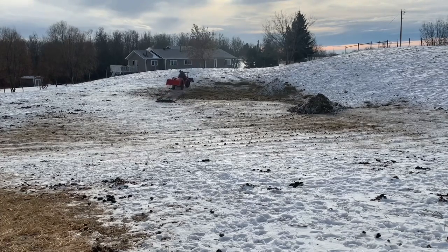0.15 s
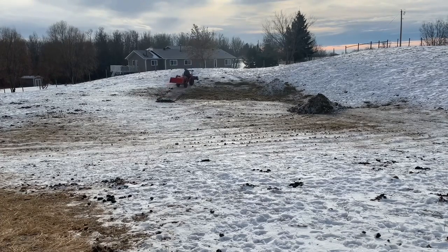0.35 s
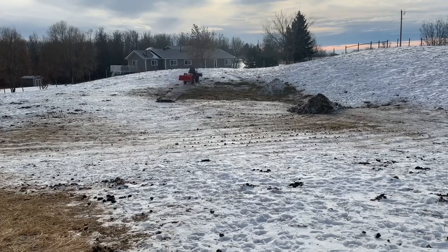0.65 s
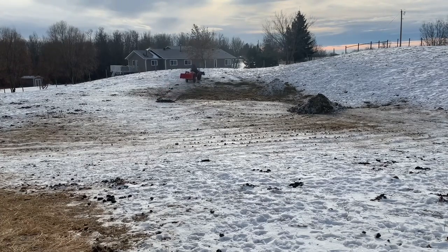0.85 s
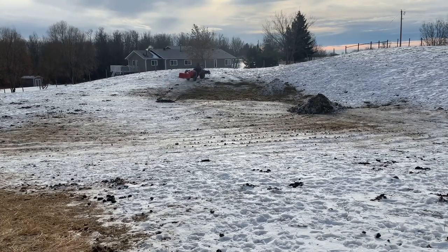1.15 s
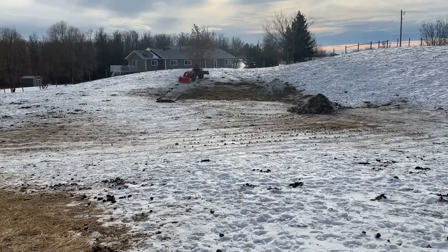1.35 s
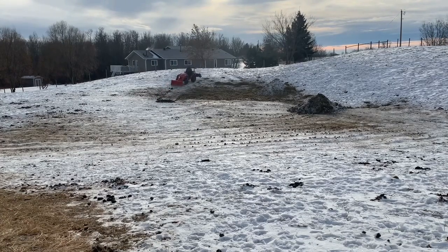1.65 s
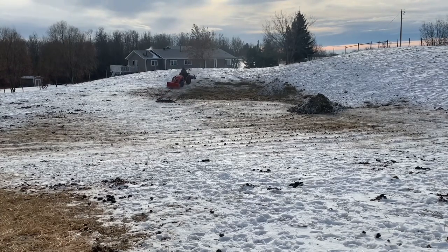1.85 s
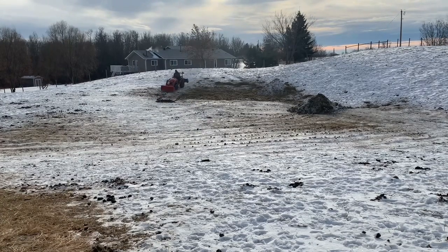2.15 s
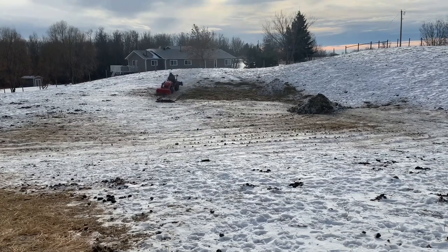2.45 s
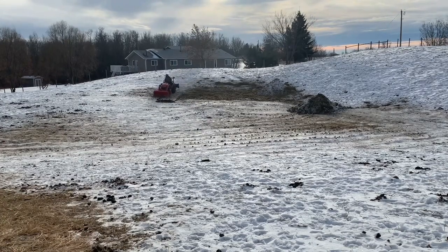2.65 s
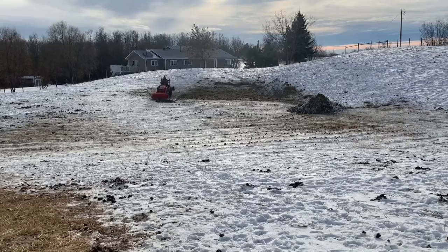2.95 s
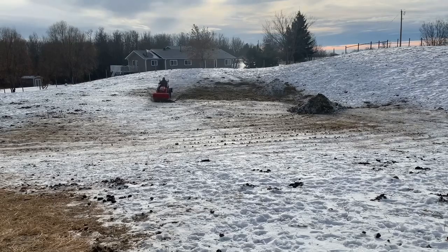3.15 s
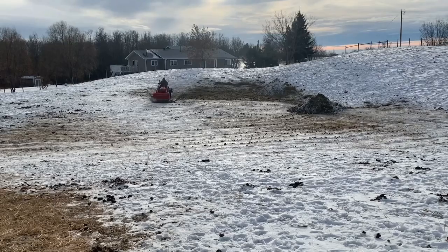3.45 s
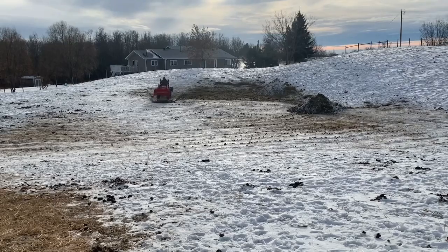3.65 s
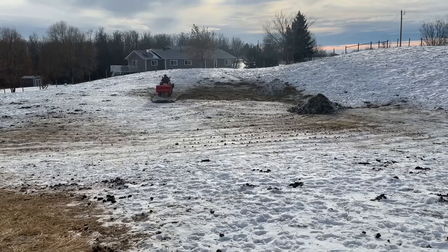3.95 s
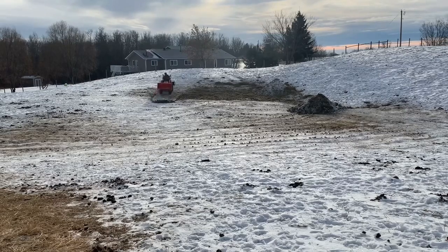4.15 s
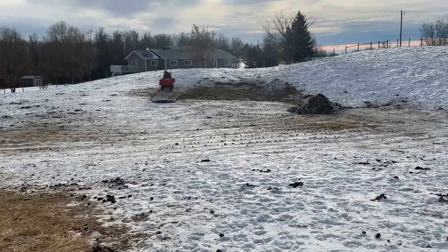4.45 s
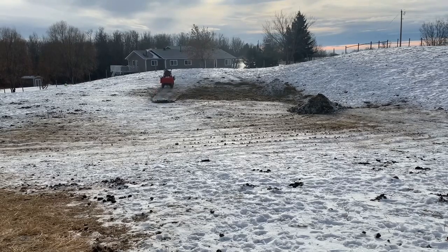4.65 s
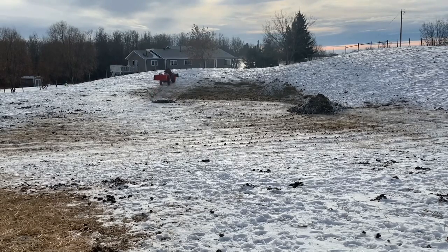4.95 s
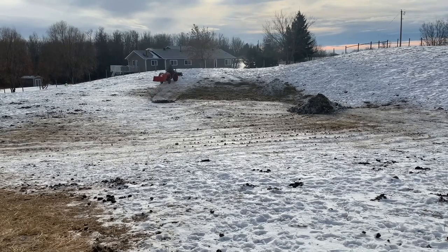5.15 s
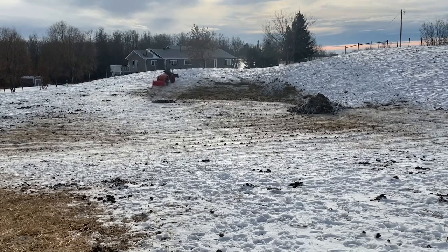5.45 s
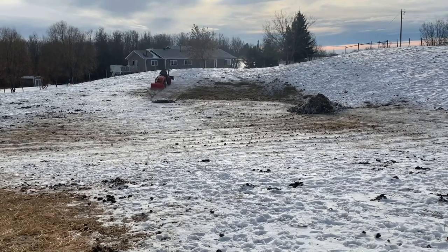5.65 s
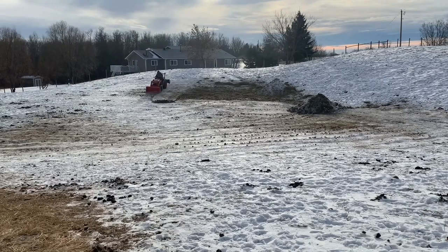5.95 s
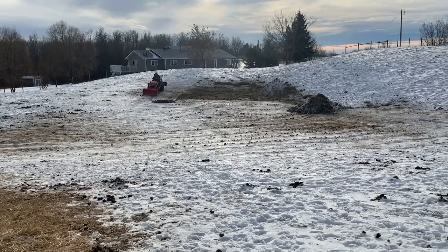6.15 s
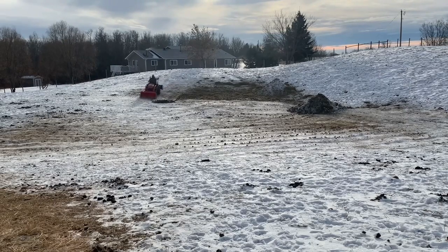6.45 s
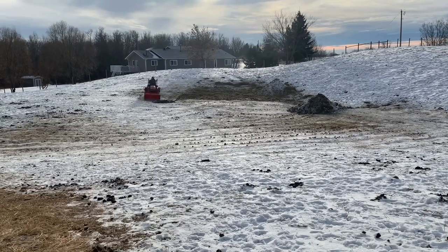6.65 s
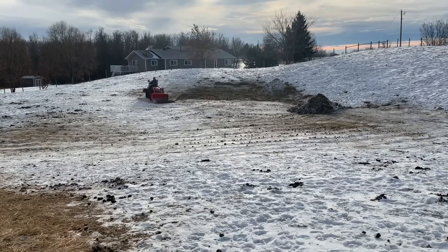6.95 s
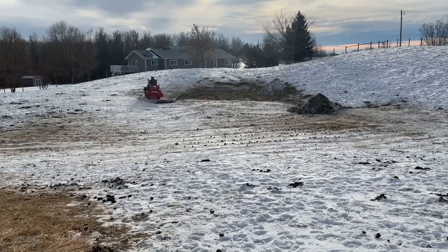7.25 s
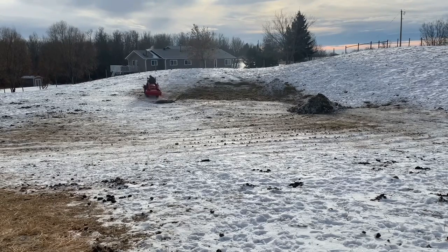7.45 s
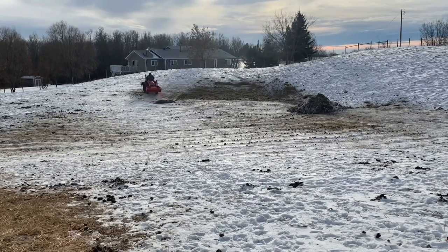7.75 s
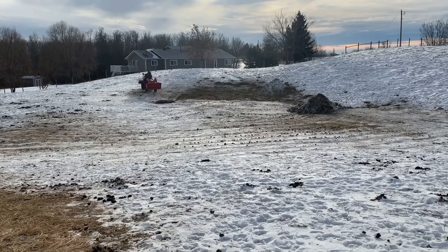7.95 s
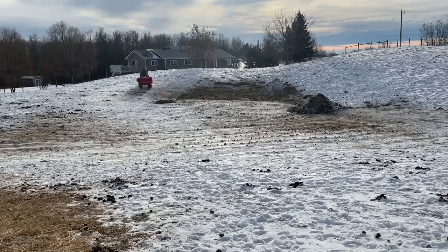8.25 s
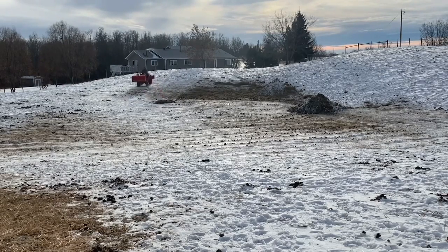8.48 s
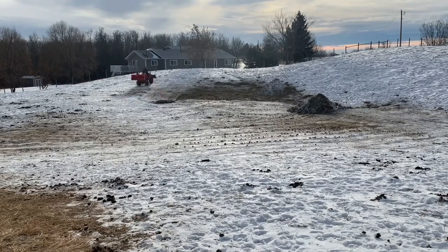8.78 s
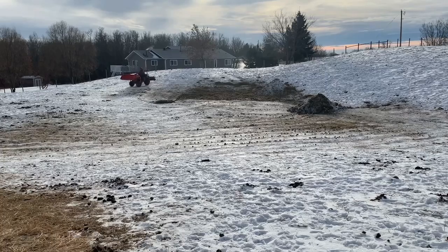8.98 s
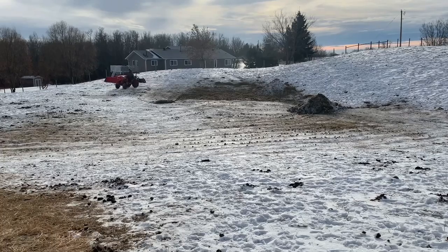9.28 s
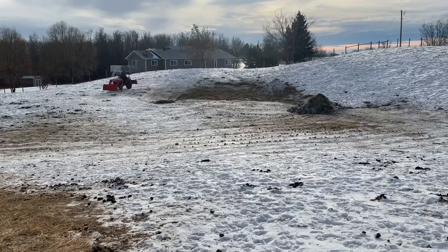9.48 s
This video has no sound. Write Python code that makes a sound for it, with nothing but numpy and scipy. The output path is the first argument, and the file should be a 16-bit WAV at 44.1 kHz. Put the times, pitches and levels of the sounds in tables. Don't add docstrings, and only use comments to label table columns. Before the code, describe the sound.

Open field, windy, phone microphone, wide but mostly centred stereo. A small diesel tractor gives a nearly constant low hydraulic whine, around the B or C near middle C, wavering slightly, over soft airy hiss. Wind pops patter in the first third of a second. From about 1.1 to 2.8 seconds the loader works: hollow, boxy panel knocks run together into a rough growl while oil hiss surges, then fades. From 3 to 4.8 the clear whine returns, with a faint very high squeal around 4.3. A sharp knock and tick land at 4.84, hard wind pops near 4.95, then a louder rattling, hissing stroke from 5.1 to 6.5, easing as it goes. Whine and gusts continue, slightly duller. Light steel ticks scatter from 8.75 to 9.1, and a sudden dense rattle with hiss bursts from 9.35 to the end at about 9.6.

```python
import sys
import numpy as np
from scipy import signal
from scipy.fft import rfft, irfft, next_fast_len
from scipy.io import wavfile
from scipy.ndimage import uniform_filter1d

SR = 44100
rng = np.random.default_rng(int(sys.argv[2]) if len(sys.argv) > 2 else 0)


def int16_out(signal):
    q = np.round(np.clip(np.atleast_2d(signal).T, -1, 1) * 32767)
    wavfile.write(sys.argv[1], SR, q.astype(np.int16))


def voltage_ratio(decibels):
    exponent = np.asarray(decibels, float) / 20
    return 10 ** exponent


N = 424223
HOP = 128


# time in seconds, tooth rate in Hz, whine level in dB.
PUMP_SPEED = [(0.0, 251.5, -43), (0.45, 255.7, -30), (0.74, 256.5, -29), (0.84, 262.5, -31),
              (1.1, 262, -28), (1.25, 266.5, -27), (1.6, 267.8, -29), (2.3, 262, -28.5), (2.72, 268.3, -29),
              (3.0, 256, -27.5), (3.22, 252.3, -33.5), (3.5, 257.3, -27.5), (3.9, 255.7, -31),
              (4.5, 253.6, -31.5), (4.74, 254.2, -40.5), (4.85, 263, -30), (5.1, 262.6, -30),
              (6.4, 261.7, -30), (6.75, 258.1, -32), (7.04, 255.2, -43), (7.2, 253, -31),
              (7.9, 255.3, -31.5), (8.0, 258.6, -26), (8.24, 259, -40), (8.33, 263.6, -30),
              (8.47, 263.8, -31.5), (8.56, 258, -29), (8.94, 256.9, -29), (9.04, 263.9, -28.5),
              (9.62, 265, -30)]
# start and end in seconds, multiple of the tooth rate, level in dB.
PUMP_OVERTONES = [(0.35, 0.93, 2, -42), (3.004, 4.11, 2, -37), (6.79, 7.51, 2, -42), (7.447, 8.763, 2, -37),
                  (8.69, 9.101, 2, -41.5), (0.36, 1.15, 3, -48), (2.505, 3.08, 3, -47),
                  (3.18, 4.903, 3, -43), (7.124, 7.686, 3, -44), (7.617, 8.697, 3, -41.5),
                  (8.605, 9.314, 3, -37), (0, 1.134, 4, -48), (1.402, 1.8, 4, -52), (2.906, 3.8, 4, -47),
                  (3.702, 4.5, 4, -53.5), (1.852, 2.552, 4, -50.5), (2.849, 3.5, 5, -56),
                  (4.052, 4.6, 2, -51), (5.9, 6.6, 3, -48), (8.993, 9.402, 2, -42), (9.154, 9.62, 4, -54),
                  (5.05, 5.5, 3, -46.5), (9.195, 9.746, 3, -43.5), (9.3, 9.75, 2, -39)]
SWELL_S = .13


def pump():
    t = np.arange(N) / SR
    tooth_hz, whine_db = curves(PUMP_SPEED, t)
    turns = np.cumsum(tooth_hz * (1 + 0.003 * wander(45.3))) / SR
    out = voltage_ratio(whine_db + 0.63 * wander(27)) * np.sin(2 * np.pi * turns)
    for start, end, multiple, db in PUMP_OVERTONES:
        part = slice(round(start * SR), round(end * SR))
        spell = np.minimum(np.minimum(t[part] - start, end - t[part]) / SWELL_S, 1)
        waver_db = (1.1 + 0.07 * multiple) * wander(52, count=len(spell))
        out[part] += spell * voltage_ratio(db + waver_db) * np.sin(2 * np.pi * round(multiple) * turns[part])
    return np.sqrt(2) * out


# time in seconds, peak in dB, ring in Hz.
PANEL_JOLTS = [(4.84, -14, 554), (4.864, -17, 570), (4.884, -25, 577), (8.759, -21.5, 509),
               (8.972, -21, 527), (9.356, -13.5, 557), (9.384, -18.5, 431), (9.414, -22, 526),
               (9.434, -13.5, 542), (9.469, -14, 519), (9.499, -17.5, 517), (9.529, -24, 507),
               (9.558, -12, 508.5), (9.595, -13, 518),
               (1.104, -17.5, 522), (1.197, -17, 515), (1.255, -11.5, 505), (1.317, -16, 507),
                      (1.385, -29, 477), (1.416, -17.5, 512), (1.549, -17, 493), (1.644, -13.5, 504),
                      (1.685, -15, 498), (1.739, -20, 587), (1.756, -17, 500), (1.786, -18, 493),
                      (1.83, -19, 533), (1.861, -17, 538), (1.901, -12, 495), (1.957, -18, 506),
                      (2.025, -17, 505), (2.099, -18, 509), (2.125, -14.5, 480), (2.192, -11, 504),
                      (2.225, -11.5, 503), (2.258, -23, 530), (2.283, -21, 563), (2.302, -25, 540),
                      (2.32, -25, 504), (2.345, -19, 508), (2.369, -12.5, 501), (2.434, -18, 584),
                      (2.448, -17, 497), (2.493, -17, 514), (2.511, -23.5, 521), (2.543, -23, 552),
                      (2.625, -12.5, 493), (2.682, -30, 526), (2.714, -20, 514.5), (2.779, -22, 510),
                      (2.806, -19, 516.4),
               (5.044, -35, 492.4), (5.082, -12.5, 500), (5.175, -18, 614), (5.238, -19, 547.6),
                       (5.254, -15, 495), (5.314, -9.5, 511), (5.359, -17, 555), (5.402, -15, 509.5),
                       (5.463, -20, 614.5), (5.48, -17, 525), (5.508, -12.5, 514), (5.553, -12.5, 500),
                       (5.617, -18, 511.5), (5.641, -14.5, 522), (5.675, -13, 497), (5.709, -16, 516),
                       (5.75, -8, 516.4), (5.776, -7, 502), (5.829, -9.5, 569), (5.903, -17.5, 497),
                       (5.946, -20, 517), (5.985, -16, 484), (6.021, -23, 523), (6.048, -15, 498),
                       (6.083, -17, 490), (6.125, -15.5, 546), (6.15, -13, 510), (6.209, -14, 508),
                       (6.242, -12.5, 494), (6.269, -16, 539), (6.296, -20, 468), (6.309, -13.5, 529),
                       (6.38, -13, 487), (6.41, -19, 510), (6.436, -21, 530), (6.459, -23, 504.3),
                       (6.484, -22.5, 498), (6.541, -25, 517.5), (6.577, -25, 480.6)]
RISE_S, RING_S, UPPER_SHARE = .0009, .017, .8


def jolts():
    t, rings, struck = np.arange(3000) / SR, np.zeros(N), np.zeros(N)
    for s, db, hz in sorted(PANEL_JOLTS):
        ring = np.sin(2 * np.pi * hz * t)
        ring += UPPER_SHARE * np.sin(2 * np.pi * 1.24 * hz * t) * np.exp(-t / 0.005)
        fade = (1 - np.exp(-t / RISE_S)) * np.exp(-t / RING_S)
        start = round(s * SR)
        part, after = rings[start:][:len(t)], struck[start:][:len(t)]
        part *= np.exp(-t / RISE_S)[:len(part)]
        part += (voltage_ratio(db - 1.1) * ring * fade)[:len(part)]
        after += np.sqrt(fade)[:len(part)]
    return rings, struck


# time in seconds, level in dB.
ENGINE_LOAD = [(0, -67), (0.1, -73), (0.8, -42), (1.05, -32.5), (1.22, -25), (1.6, -23.5), (2.74, -30),
               (2.9, -41), (3.4, -37.5), (4.2, -39.5), (4.77, -42.5), (4.9, -28), (5.04, -49), (5.12, -24),
               (5.78, -22), (6.45, -26), (6.58, -39), (7.0, -39), (8.0, -36), (8.6, -36.5), (9.28, -38),
               (9.42, -21), (9.62, -28)]
# centre in Hz, width in Hz, level in dB, share that sounds without load from 0 to 1.
BODY_MODES = [(496.8, 20, 0.5, 0), (519.5, 42, 3, 0.23), (432, 53, -5.5, 0), (562.5, 105, 3, 0.28),
              (390, 214, 2.5, 0), (782, 54, -12, 0.4), (1133, 29, -14, 0)]
SETTLES = .55
CHATTER_PER_S, CHATTER = 140, 14


def boom():
    rings, struck = jolts()
    level_db = curves(ENGINE_LOAD, np.arange(N) / SR)[0]
    awake = np.clip((level_db + 42) / 10, 0, 1)
    level = voltage_ratio(level_db - 1.5 - 5 * awake)
    level *= 1 - awake * (1 - SETTLES) * (1 - np.minimum(struck, 1))
    size = next_fast_len(N)
    hz = np.fft.rfftfreq(size, 1 / SR)
    always = loaded = 0
    for centre, width, db, idle in BODY_MODES:
        mode = voltage_ratio(db) * evened(1 / (1 + 2j * (hz - centre) / (1.44 * width)) ** 2)
        always = always + idle * mode
        loaded = loaded + (1 - idle) * mode
    out = []
    for share in (1, .17):
        force = voltage_ratio(1.4 * wander(270)) + CHATTER * (rng.random(N) < CHATTER_PER_S / SR)
        shake = rfft(evened(rng.standard_normal(N) * force), size)
        shaken = irfft(shake * always, size)[:N] + awake * irfft(shake * loaded, size)[:N]
        out.append(share * level * band(shaken, 258, 1180))
    return np.array([out[0] + out[1], out[0] - out[1]]) + band(rings, 367, 920, order=1)


# start and end in seconds, surge over idle flow in dB, sag in dB per second.
RAM_STROKES = [
    (1.075, 2.81, 10, 3.5),
    (5.08, 6.5, 9.5, 4.5),
    (9.33, 11, 8.5, 22),
    (0.54, 1.14, 1.5, -1.5),
    (8.75, 9.0, 1, -3.5),
    (7.7, 8.55, -1.5, 0.3),
]
OPEN_S, SHUT_S = .05, .025


def flow(t):
    total_db = 0
    for start, end, surge_db, sag_db in RAM_STROKES:
        opening = np.clip(np.minimum((t - start) / OPEN_S, (end - t) / SHUT_S), 0, 1)
        total_db = total_db + opening * (surge_db - sag_db * (t - start))
    return total_db


# frequency in Hz, density in dB per Hz.
CLATTER_COLOUR = [(200, -3), (500, 12.5), (900, 3), (1140, 1.5), (1350, -6), (1600, -83), (2500, -69)]
# frequency in Hz, density in dB per Hz.
HISS_COLOUR = [(900, -10.5), (1500, 1.5), (2200, 3), (4000, 3), (5000, -0.5), (5700, -5), (8000, -23)]
# frequency in Hz, density in dB per Hz.
FIZZ_COLOUR = [(4500, -17.5), (5500, 1.5), (7300, -0.5), (10400, 0), (13500, -8), (15000, -10.5),
               (15800, -32)]
HISS_IDLE_DB, FIZZ_IDLE_DB, FIZZ_FOLLOWS = -46.5, -52.5, 0.76
# middle in seconds, half width in seconds, lift in dB.
OIL_SPURTS = [(1.25, .04, 4), (1.46, .05, 2.5), (1.6, .04, 3), (2.2, 0.049, -0.5), (2.65, 0.032, 0.5),
              (5.25, .1, 3.5), (5.5, 0.031, 3), (5.85, 0.064, 3), (6.4, 0.052, 0.5), (8.82, .03, 3.5),
              (9.41, .04, 1)]
# time in seconds, inverse echo delay in Hz, clatter level in dB as
# the engine side turns in and out of view, lift of the top of the fizz in dB.
TRACTOR_MOTION = [(0.0, 960, -35.5, 3), (0.9, 904, -42.5, -1), (1.8, 1056, -35.5, 4), (2.8, 1096, -41.5, 1),
                  (3.3, 1080, -32.5, -1), (4.7, 1075, -42, 1.5), (5.5, 1158, -40.5, 3.5),
                  (6.9, 1166, -36.5, -1), (7.6, 1190, -34.5, 0.5), (8.5, 1275, -53, 6), (9.2, 1466, -35, 6),
                  (9.62, 1370, -36, 5)]
RECEDES_DB_PER_S = 0.19
HAZE_FROM_S, HAZE_DB_PER_S = 7.5, 5.5
# frequency in Hz, echo over direct sound as a ratio.
ECHO_STRENGTH = [(700, .2), (1500, .85), (2600, .7), (4500, .6), (6500, .1), (9000, 0)]
# time in seconds, share of the echo left.
ECHO_LEFT = [(0, .9), (8.4, .9), (9.0, .5), (9.35, .3)]
# time in seconds, factor on frequency, housing shadow in dB.
SOURCE_BEARING = [(.6, .94, 4), (1.5, 1, 3), (2.8, 1.1, 5), (4.2, 1.04, 2), (5.2, .95, 7), (6.3, 1.1, 6),
                  (6.7, .97, 5), (7.4, .95, 6), (7.8, .95, 1)]
SHADOW_HZ, SHADOW_WIDTH_HZ = 5950, 550


def machine():
    t, hz = spectral_grid()
    echo_hz, clatter_db, top_db = curves(TRACTOR_MOTION, t)
    oil_db = flow(t)
    hiss_db = HISS_IDLE_DB + oil_db
    fizz_db = FIZZ_IDLE_DB + FIZZ_FOLLOWS * oil_db - RECEDES_DB_PER_S * t + bumps(OIL_SPURTS, t)
    treble_db = (top_db + 2.0) * np.clip((hz - 10800) / 1800, 0, 1.9)
    treble_db -= HAZE_DB_PER_S * np.maximum(t - HAZE_FROM_S, 0) * np.clip((hz - 9000) / 3000, 0, 2)
    size = voltage_ratio(clatter_db - 4.0) * shape(CLATTER_COLOUR, hz)
    size += voltage_ratio(hiss_db + 1.5) * shape(HISS_COLOUR, hz)
    size += voltage_ratio(fizz_db + 5.0 + treble_db) * shape(FIZZ_COLOUR, hz)
    stretch, shadow_db = curves(SOURCE_BEARING, t)
    size /= voltage_ratio(shadow_db * np.exp(-((hz / stretch - SHADOW_HZ) / SHADOW_WIDTH_HZ) ** 2))

    noise = rng.standard_normal((len(t), len(hz)))
    patches = evened(uniform_filter1d(uniform_filter1d(noise, 24, 0), 6, 1)).T
    streaks = evened(uniform_filter1d(rng.standard_normal((len(t), len(hz))), 160, 0)).T
    flicker = evened(uniform_filter1d(rng.standard_normal(len(t)), 12))
    sputter = evened(uniform_filter1d(rng.standard_normal(len(t)), 5))
    uneven_db = (0.44 + hz / 9000) * patches + 3.35 * streaks + 0.67 * flicker + hz / 9000 * sputter

    delay = np.exp(-2j * np.pi * hz / echo_hz)
    left_echo = read(ECHO_STRENGTH, hz) * curves(ECHO_LEFT, t)[0]
    right_echo = left_echo * np.exp(-hz / 2500)
    left, right = ((1 + a * delay) / np.sqrt(1 + a ** 2) for a in (left_echo, right_echo))
    return ports(size * voltage_ratio(uneven_db), left, right)


# start and end in seconds, centre in Hz, width in Hz, level in dB.
THIN_TONES = [
    (3.2, 4.0, 9510, 60, -65),
    (1.05, 2.4, 3920, 40, -54),
    (6.8, 7.7, 4735, 25, -63),
    (6.9, 7.8, 1270, 8, -56),
    (0, .8, 5930, 50, -68),
    (8.6, 9.15, 2700, 700, -55),
    (1.05, 1.7, 3920, 120, -52),
    (5.1, 6.3, 1125, 40, -51),
    (8.0, 8.75, 8000, 160, -62),
    (7.7, 8.15, 9000, 160, -63),
]


def thin_tones():
    out = np.zeros(N)
    for start, end, hz, width, db in THIN_TONES:
        part = out[round(start * SR):round(end * SR)]
        tone = resonate(resonate(rng.standard_normal(len(part)), hz, width), hz, width)
        part += voltage_ratio(db) * evened(tone) * signal.windows.tukey(len(part), .4)
    return out


# time in seconds, frequency in Hz, level in dB.
VALVE_SQUEAL = [
    (3.85, 9120, -57.5),
    (4.3, 8920, -48),
    (4.85, 9000, -52.5),
]


def squeal():
    t = np.arange(N) / SR
    hz, level_db = curves(VALVE_SQUEAL, t)
    sounding = uniform_filter1d(1. * (t > VALVE_SQUEAL[0][0]) * (t < VALVE_SQUEAL[-1][0]), 11000)
    level = sounding * voltage_ratio(level_db + 2.5 + 3.4 * wander(10.0)) * wander(520)
    return level * np.sin(2 * np.pi * np.cumsum(hz) / SR)


# time in seconds, peak in dB, ring in Hz.
STEEL_TICKS = [
    (4.8365, -22.5, 2354),
    (8.7594, -30, 2356),
    (8.8309, -24, 2650),
    (8.899, -34, 2690),
    (8.981, -27.5, 2500),
    (9.0681, -28, 3000),
]


def ticks():
    out, t = np.zeros((2, N + SR)), np.arange(1500) / SR
    for s, db, hz in STEEL_TICKS:
        ring = evened(resonate(rng.standard_normal(len(t)), hz, 600)) * np.exp(-t / 0.012)
        out[:, round(s * SR):][:, :len(t)] += voltage_ratio(db - 11.5) * ring * np.array([[1.2], [.7]])
    return out[:, :N]


# time in seconds, crack peak in dB, thump peak in dB.
WIND_POPS = [(0.0004, -28.5, -49), (0.045, -29, -35), (0.059, -34, -41), (0.092, -43, -33),
             (0.122, -37, -34), (0.1594, -44, -40), (0.297, -27, -33), (0.306, -32.5, -38),
             (0.315, -29, -41), (0.342, -29, -38), (1.0375, -33, -21), (1.062, -35, -31),
             (1.1185, -27, -16), (1.2875, -38, -18), (1.435, -22.5, -26), (1.474, -31, -13),
             (1.4865, -26, -18.5), (1.6004, -23, -22), (1.614, -22, -19), (1.8652, -22, -28),
             (2.5074, -29, -25), (4.555, -25, -33), (4.5632, -44, -16.5), (4.5996, -49, -12.5),
             (4.673, -30, -34), (4.7069, -24, -23), (4.9183, -25, -18), (4.932, -21, -19),
             (4.9427, -11.5, -24), (4.9363, -19, -23), (4.9467, -15, -18), (4.9555, -23, -31),
             (4.9711, -26, -19), (4.9906, -26, -16.5), (5.007, -19, -24), (5.4089, -25, -15),
             (5.5846, -27, -22), (5.7028, -30, -26), (5.7847, -24.5, -27), (5.8135, -18.5, -19),
             (5.9466, -31, -27), (6.1249, -19, -14), (6.331, -16, -27), (6.351, -22, -20),
             (6.3672, -21, -32), (6.3845, -23, -21), (6.4004, -22, -19), (6.445, -27, -19),
             (6.541, -22, -25), (6.575, -20, -35), (6.5786, -23, -21), (6.6167, -30, -31),
             (6.796, -23, -23), (6.8296, -26, -28), (6.887, -23, -27), (6.929, -39, -23), (7.128, -35, -19),
             (7.422, -35, -17.5), (7.8749, -25, -41), (9.4082, -23, -31)]
SLAP_S, SLAP_LAG_S = 0.0038, .0015


def pops():
    out, t = np.zeros((2, N + SR)), np.arange(1500) / SR
    for s, crack_db, thump_db in WIND_POPS:
        noise = rng.standard_normal((2, len(t))) * [[1], [.3]]
        noise[0, 12] += 13
        puff = np.array([noise[0] + noise[1], noise[0] - noise[1]])
        puff *= (1 - np.exp(-t / 0.0001)) * np.exp(-t / SLAP_S)
        softness = 10 if crack_db > -25 else 13
        crack = band(uniform_filter1d(puff, softness), 420, 1800, order=2)
        thump = band(puff, 150, 480, order=2)
        pop = voltage_ratio(crack_db + 1.5) * crack / abs(crack).max() + voltage_ratio(thump_db + 2.0) * thump / abs(thump).max()
        out[:, round((s + SLAP_LAG_S) * SR):][:, :len(t)] += pop
    return out[:, :N]


# time in seconds, rumble in dB.
WIND_GUSTS = [(0.0, -41.5), (0.35, -43.5), (0.43, -54.5), (0.72, -51.5), (0.82, -41.5), (1.6, -40),
              (2.6, -40.5), (3.3, -49), (4.3, -47.5), (4.58, -42), (4.96, -38.5), (5.15, -40), (5.8, -38.5),
              (6.62, -40.5), (6.85, -41), (7.05, -42.5), (7.6, -39.5), (8.0, -40), (8.6, -40.5),
              (8.74, -47.5), (9.24, -60), (9.33, -43)]
# middle in seconds, half width in seconds, lift in dB.
WIND_BLASTS = [(.05, 0.0077, 5.5), (.32, 0.051, 3), (1.45, 0.098, 5), (1.6, 0.049, 6), (1.866, 0.018, 4),
               (4.58, 0.031, 5), (4.714, 0.0056, 8.5), (4.942, 0.023, 9.5), (4.995, 0.028, 4.5),
               (5.8, 0.13, 3.5), (6.37, 0.041, 5.5), (6.58, 0.018, 6.5), (6.85, 0.073, 3.5),
               (7.126, 0.012, 3.5), (9.42, 0.021, 0.5)]
# frequency in Hz, level in dB.
WIND_COLOUR = [(60, -3), (160, -8), (220, 12.5), (1000, -1), (1600, -23), (3200, -50)]
SLOPE_DB, BRIGHTENS = -8, 1


def wind():
    t, hz = spectral_grid()
    lift_db = bumps(WIND_BLASTS, t)
    level_db = curves(WIND_GUSTS, t)[0] + lift_db
    slope_db = np.minimum(SLOPE_DB + BRIGHTENS * lift_db, 0)
    lumps = evened(uniform_filter1d(rng.standard_normal(len(t)), 3))
    above = np.log2(np.maximum(hz, 240) / 240)
    below = np.log2(np.maximum(120 / (hz + 20), 1))
    colour_db = read(WIND_COLOUR, hz) + slope_db * above + 0.51 * (level_db + 37.5) * below
    rumble = ports(voltage_ratio(level_db + 2.0 * lumps + colour_db - 1.0))
    eddy_level = voltage_ratio(np.interp(np.arange(N) / SR, t, level_db) + 30.0)
    eddies = (rng.random(N) < 70 / SR) * rng.standard_normal(N) * eddy_level
    return rumble + band(uniform_filter1d(eddies, 14), 240, 850, order=2)


# frequency in Hz, correlation from 0 to 1.
PORT_LIKENESS = [(100, .82), (300, .88), (1000, .89), (2000, .86), (4000, .64), (5900, .72), (7000, .55),
                 (9000, .5), (15000, .56)]
# frequency in Hz, lead of the left port in radians.
PORT_LEAD = [(100, 0), (860, .2), (2070, 1.1), (3700, .3), (5860, 3.3), (7000, .5), (9900, .3),
             (15200, 3.1)]
# frequency in Hz, left over right in dB.
PORT_TILT = [(200, 0), (1200, -.5), (2000, 4.5), (3500, 5.5), (5800, 2), (15000, -.8)]


def ports(size, left_path=1, right_path=1):
    t, hz = spectral_grid()
    a, b, c, d = rng.standard_normal((len(t), len(hz), 4)).T
    shared, own = a + 1j * b, c + 1j * d
    same = np.clip(read(PORT_LIKENESS, hz), -1, 1)
    lead = read(PORT_LEAD, hz / curves(SOURCE_BEARING, t)[0])
    right = same * shared * np.exp(-1j * lead) + np.sqrt(1 - same ** 2) * own
    half = voltage_ratio(read(PORT_TILT, hz) / 2)
    z = size * np.array([shared * left_path * half, right * right_path / half])
    return signal.istft(z, nperseg=4 * HOP, noverlap=3 * HOP)[1][:, :N]


def evened(x):
    return x / np.sqrt(np.mean(abs(x) ** 2) + 1e-20)


def read(points, hz):
    f, value = np.transpose(points)
    return np.interp(np.log(hz + 1), np.log(f + 1), value)


def curves(rows, t):
    s, *columns = np.transpose(rows)
    return [np.interp(t, s, c) for c in columns]


def bumps(rows, t):
    return sum(db * np.exp(-((t - s) / half) ** 2) for s, half, db in rows)


def wander(rate_hz, count=N):
    span = max(int(SR / rate_hz), 1)
    return evened(uniform_filter1d(uniform_filter1d(rng.standard_normal(count), span), span))


def resonate(x, hz, width):
    pole = np.exp((2j * hz - width) * np.pi / SR)
    return 2 * signal.lfilter([1 - abs(pole)], [1, -pole], x).real


def band(x, lo_hz, hi_hz, order=3):
    return signal.sosfilt(signal.butter(order, [lo_hz, hi_hz], "bandpass", fs=SR, output="sos"), x)


def spectral_grid():
    return np.arange(N // HOP + 6) * HOP / SR, np.fft.rfftfreq(4 * HOP, 1 / SR)[:, None]


def shape(table, hz):
    gain = voltage_ratio(read(table, hz))
    return gain / np.linalg.norm(gain)


def scene():
    whine = pump() * voltage_ratio(np.array([[-.2], [.2]]))
    return whine + boom() + machine() + thin_tones() + squeal() + ticks() + pops() + wind()


def roll_off(x):
    return signal.sosfilt(signal.butter(12, 15690, fs=SR, output="sos"), x)


LEAK = .07


def record(dry):
    cut = signal.sosfilt(signal.butter(3, 150, "highpass", fs=SR, output="sos"), dry)
    return roll_off(cut + LEAK * dry)


dry = scene()
out = record(dry)
int16_out(out)
```